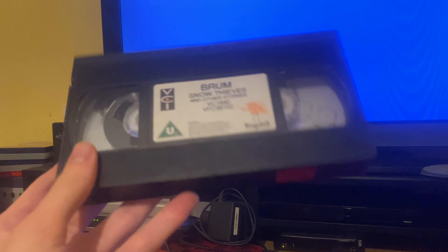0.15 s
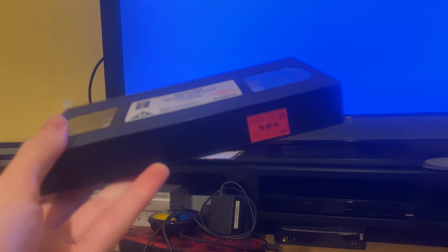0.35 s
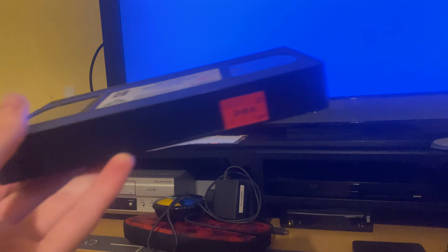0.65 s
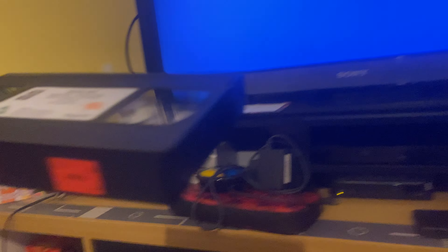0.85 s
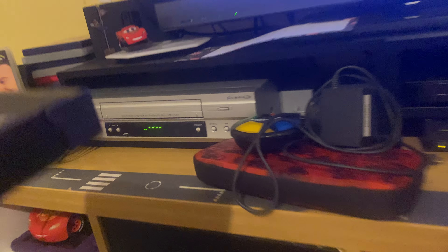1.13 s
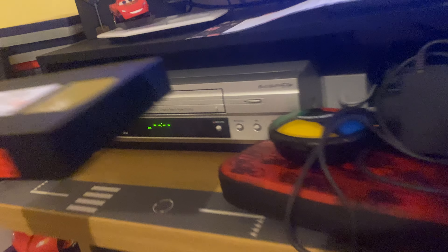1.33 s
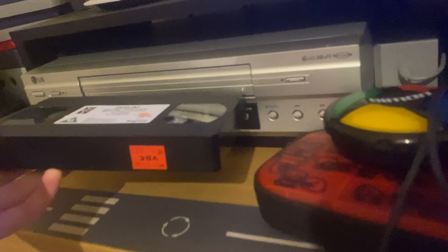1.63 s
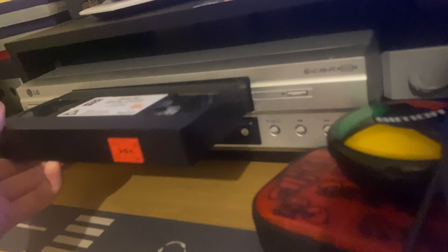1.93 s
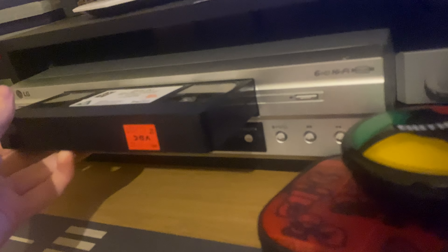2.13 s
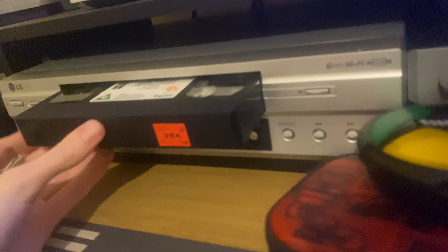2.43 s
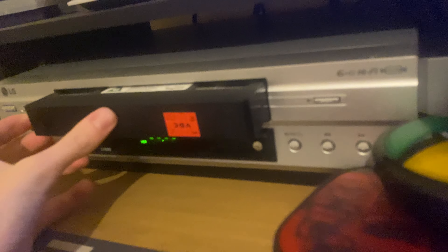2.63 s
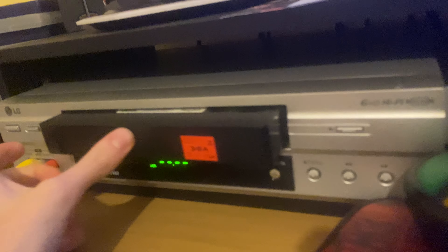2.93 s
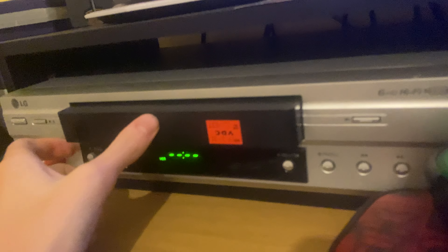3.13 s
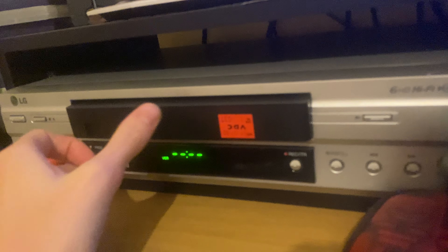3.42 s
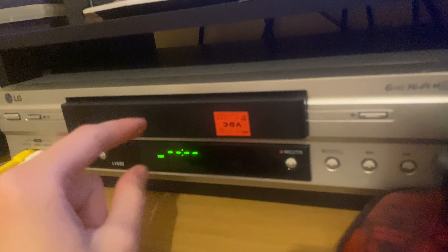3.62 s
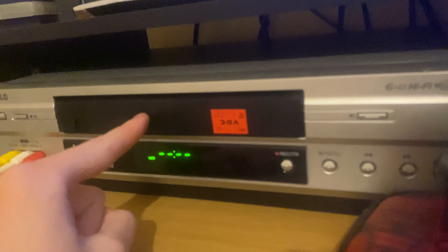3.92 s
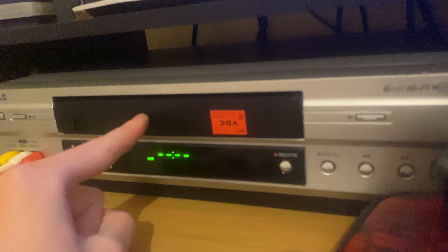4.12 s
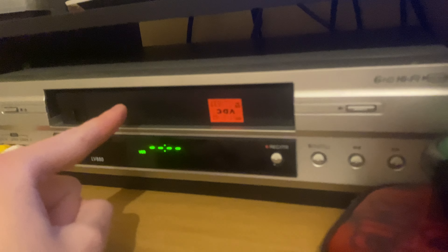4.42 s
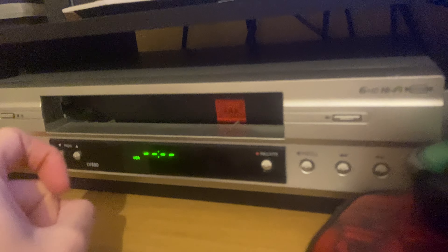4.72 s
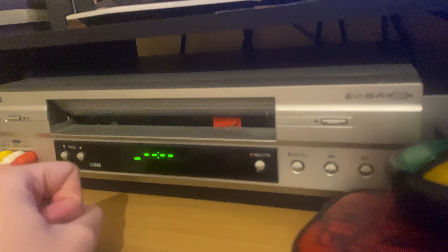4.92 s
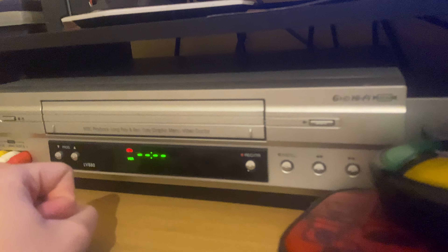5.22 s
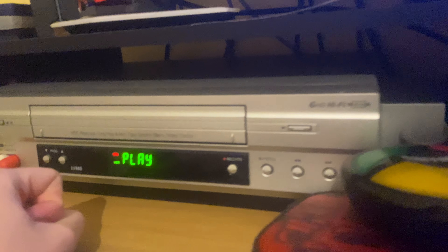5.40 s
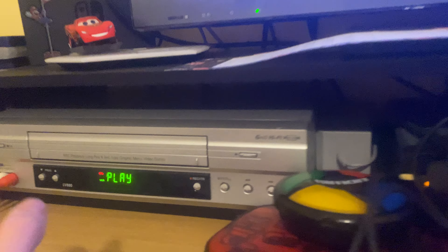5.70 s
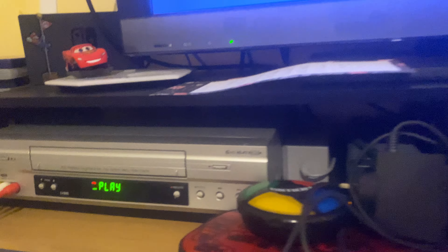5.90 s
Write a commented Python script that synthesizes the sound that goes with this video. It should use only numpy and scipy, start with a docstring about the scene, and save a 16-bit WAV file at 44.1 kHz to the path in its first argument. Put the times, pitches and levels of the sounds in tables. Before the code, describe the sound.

A close stereo microphone in a small room picks up faint hiss, a thin very high whistle and low handling rumble. Light plastic ticks come first, with a dull hollow knock at about 0.8 seconds and a soft finger rub near 1.2. From 1.5 to 2.6 the cassette clatters loudly against the player's slot: rapid hard clacks, boxy thuds and short scrapes. The contacts thin out, with separate clicks around 3.0, 3.25 and 3.35, then near quiet. Around 4.0 the loading mechanism engages, high metallic gear ringing joined by a rough, growling whine near 1200 hertz. At 4.7 to 4.8 the tray drops in a tight cluster of clunks; smaller clicks at 4.9 and 5.1 to 5.2 close the flap. The whine turns thin and faint, a brief very quiet high tone appears around 5.3 to 5.6, and tiny ticks trail off to 6 seconds.

```python
"""Someone pushes a plastic tape cassette by hand into a player in a small room, close to a two-port microphone.
Room hiss, a thin whistle and a low rumble lie underneath from the start: filtered noise and a drifting sine.
The shell then knocks, chatters and scrapes in the tray: short and long stretches of noise, coloured by ringing.
A motor draws the tape in with a whine and ringing gears, the tray drops and the flap shuts.
A brief thin tone sounds as the tape starts."""
import sys
import numpy as np
from scipy import signal
from scipy.fft import rfft, irfft, next_fast_len
from scipy.io import wavfile
from scipy.ndimage import map_coordinates

SR = 44100
rng = np.random.default_rng(int(sys.argv[2]) if len(sys.argv) > 2 else 0)


def level_to_linear(level):
    """Convert decibel levels to linear amplitude factors, elementwise."""
    exponent = np.asarray(level, float) / 20
    return 10 ** exponent


def dump(signal):
    """Clip the signal to [-1, 1] and save it as 16-bit WAV at the path in sys.argv[1]."""
    limited = np.clip(np.atleast_2d(signal).T, -1, 1)
    pcm = np.round(limited * 32767).astype(np.int16)
    wavfile.write(sys.argv[1], SR, pcm)


N = 266893

# strength of the low rumble before each use trims it: (time [s], level [dB])
RUMBLE_LEVEL = [(0, -57.5), (.2, -57.5), (.33, -53), (.69, -55.5), (.83, -39), (.94, -49.5), (1.02, -60),
                (1.25, -59), (1.43, -60), (1.5, -41), (1.62, -40.5), (1.69, -39), (1.75, -52), (1.82, -42),
                (1.95, -59.5), (2.26, -60), (2.33, -48), (2.37, -66), (2.42, -50), (2.54, -60), (3, -77),
                (3.12, -57.5), (3.2, -89), (3.3, -65), (3.42, -56), (3.48, -74), (4.05, -89), (4.65, -73),
                (4.8, -55.5), (5, -53.5), (5.1, -67), (5.6, -79), (5.73, -73.5), (6.05, -78.5)]
FREED_S = 4.8  # from here the tape runs and the motor is no longer loaded


def unit(x):
    """Scales a sound to an rms of 1, so that a level can be set afterwards."""
    return x / np.sqrt(np.mean(x ** 2) + 1e-20)


def along(points, hz):
    """Reads a curve of (frequency [Hz], value) points on a log frequency axis."""
    f, v = np.transpose(points)
    return np.interp(np.log(hz + 1), np.log(f + 1), v)


def curves(rows):
    """Gives one value per sample for each column after the time."""
    s, *cols = np.transpose(rows)
    return [np.interp(np.arange(N) / SR, s, c) for c in cols]


def wobble(rate):
    """Draws a smooth random curve with rate random points a second."""
    return map_coordinates(rng.standard_normal(N // 20), [np.arange(N) * rate / SR])


def held(s, hold, db, rise, fall):
    """Gives a level [dB] that climbs 30 dB per rise [s], holds, then drops 30 dB per fall [s]."""
    t = np.arange(N) / SR - s
    return db + 30 * (np.minimum(t, 0) / rise - np.maximum(t - hold, 0) / fall)


def tone(hz, db):
    """Makes a sine that follows a pitch and an rms level."""
    return np.sqrt(2) * level_to_linear(db) * np.sin(2 * np.pi * np.cumsum(hz) / SR)


def filtered(x, response):
    """Filters x by a complex response of frequency."""
    m = next_fast_len(N + SR // 2)
    return irfft(rfft(x, m) * response(np.fft.rfftfreq(m, 1 / SR)), m)[..., :N]


def modes(table):
    """Response of things that ring: a sum of (frequency [Hz], width [Hz], level [dB]) resonances."""
    def response(f):
        total = 0
        for k, (centre, width, db) in enumerate(table):
            peak = 1j * f * width / (centre * centre - f * f + 1j * f * width)
            total = total + (-1) ** k * level_to_linear(db) * peak  # signs alternate
        return total
    return response


def band(lo_hz, hi_hz):
    """Response of the shell within one band: its overall colour and the resonances of its panels."""
    # colour of struck plastic and sheet metal: (frequency [Hz], density [dB per Hz])
    shell_colour = [(71, -56.5), (120, -26), (508, -9.5), (735, -4.5), (942, -2), (2240, -3), (2690, -7),
                    (3740, -9.5), (5210, -11), (6950, -17.5), (9460, -18.5), (11200, -19), (13200, -19),
                    (16500, -24)]
    # ringing panels of shell and tray: (frequency [Hz], width [Hz], level [dB])
    panel_rings = [(713, 120, -6), (919, 48, 7), (1161, 280, -7), (1248, 30, 8), (1846, 90, -2),
                   (2218, 60, 6), (3364, 420, -12), (4360, 120, 8), (4870, 680, -3), (6430, 400, 9.5),
                   (11170, 860, -5.5)]

    def response(f):
        edges = (1j * f / (lo_hz + 1j * f) * hi_hz / (hi_hz + 1j * f)) ** 2
        return edges * level_to_linear(along(shell_colour, f)) * (1 + modes(panel_rings)(f))
    return response


def grainy(rough):
    """Makes two noises whose strength jumps together, as a rubbing surface slips."""
    return unit(rng.standard_normal((2, N)) * np.exp(rough * wobble(500)))


def hiss():
    """The room and the microphone hiss: steady noise with a fixed colour."""
    # colour of the hiss: (frequency [Hz], density [dB per Hz])
    hiss_colour = [(30, -1), (70, 0), (250, -8), (600, -2.5), (1300, -9.5), (2500, -6.5), (5000, -33),
                   (8000, -32), (11500, -24.5), (14000, -30), (15600, -34), (16000, -65)]
    noise = rng.standard_normal((2, N))
    return level_to_linear(-67.0) * unit(filtered(noise, lambda f: level_to_linear(along(hiss_colour, f))))


def whistle():
    """A thin, fuzzy high whistle: noise squeezed through a narrow resonance."""
    # the whistle: (frequency [Hz], level before a 5 dB lift [dB])
    whistle_line = [(15186, -87)]
    (hz, db), = whistle_line
    noise = rng.standard_normal((2, N))
    return level_to_linear(db + 5) * unit(filtered(noise, lambda f: modes([(hz, 160, 0)])(f) ** 2))


def rumble():
    """A lumpy rumble: a low sine of drifting pitch plus noise around 70 Hz, partly alike at both ports."""
    # middle of the drifting pitch: (time [s], frequency [Hz])
    rumble_pitch = [(0, 73.8), (1.42, 72), (1.52, 55.95), (4.8, 59.3), (5, 70.7), (6.05, 62.6)]
    hz, = curves(rumble_pitch)
    db, = curves(RUMBLE_LEVEL)
    drifting = tone(hz + 5 * wobble(30), db - 1.6 + 2.4 * wobble(20))
    noise = [[1, 0.44], [1, -.4]] @ rng.standard_normal((2, N))
    lumps = level_to_linear(db - 2.5) * unit(filtered(noise, lambda f: modes([(70, 110, 0)])(f) ** 2))
    return drifting + lumps


def slide():
    """Plastic rubs along the guides: uneven slips in three bands, and small rattles in tray and shell."""
    # rubbing: (time [s], strength before the layer levels [dB], brightness [dB])
    rubbing = [(0, -74, -6.5), (.2, -66.5, -2), (.5, -88.5, -22), (.72, -58.5, 6), (.99, -57, 2),
               (1.23, -67.5, 5), (1.48, -57, 3.5), (1.62, -80, -12), (1.72, -36.5, -1.5), (1.85, -60, 6),
               (1.97, -52, -8), (2.11, -44, -1), (2.19, -43, 5), (2.44, -48.5, -1), (2.53, -43.5, 2.5),
               (2.66, -57.5, -4), (2.8, -64, -2.5), (2.95, -64, -3.5), (3.15, -65, 3), (3.32, -49.5, -0.5),
               (3.5, -68, 6), (3.77, -70.5, 0), (4.03, -65, 1.5), (4.24, -66, 8), (4.45, -63, 13.5),
               (4.63, -53, 2), (4.85, -51, 9), (5.07, -57.5, -3.3), (5.22, -65.5, -5), (5.36, -67, -4),
               (5.73, -69, 2.5), (6.05, -66, 0)]
    ticks_per_s, tick_spread_db = 130, 4
    scrape_db, rustle_db, tick_db = -8, -15.5, -7.5  # over the strength of the rub
    rub_db, bright_db = curves(rubbing)
    stroke = wobble(25)

    rub_level = level_to_linear(rub_db - bright_db + 1.7 * stroke)
    rub = rub_level * unit(filtered(grainy(rough=0.37), band(580, 1500)))
    scrape_level = level_to_linear(rub_db + scrape_db + 1.3 * stroke)
    scrape = scrape_level * unit(filtered(grainy(rough=0.28), band(2030, 2900)))
    rustle_level = level_to_linear(rub_db + rustle_db + bright_db + 1.7 * wobble(23))
    rustle = rustle_level * unit(filtered(grainy(rough=0.33), band(3500, 18000)))

    # each tick is a burst of noise that dies away over 2.7 ms
    starts = (rng.random(N) < ticks_per_s / SR) * level_to_linear(tick_spread_db * rng.standard_normal(N))
    fading = filtered(starts, lambda f: 1 / (1 + 2j * np.pi * f * 0.0027))
    bursts = fading * rng.standard_normal((2, N))
    ticks = level_to_linear(rub_db + tick_db) * unit(filtered(bursts, band(1200, 6980)))
    return rub + scrape + rustle + ticks


def drone():
    """Rub and rumble make the case drone: rough noise through two low, wide resonances."""
    # rubbing: (time [s], strength before its trim [dB], brightness [dB], unused here)
    rub_strength = [(0, -74, -6.5), (.2, -66.5, -2), (.5, -88.5, -22), (.72, -58.5, 6), (.99, -57, 2),
                    (1.23, -67.5, 5), (1.48, -57, 3.5), (1.62, -80, -12), (1.72, -36.5, -1.5),
                    (1.85, -60, 6), (1.97, -52, -8), (2.11, -44, -1), (2.19, -43, 5), (2.44, -48.5, -1),
                    (2.53, -43.5, 2.5), (2.66, -57.5, -4), (2.8, -64, -2.5), (2.95, -64, -3.5),
                    (3.15, -65, 3), (3.32, -49.5, -0.5), (3.5, -68, 6), (3.77, -70.5, 0), (4.03, -65, 1.5),
                    (4.24, -66, 8), (4.45, -63, 13.5), (4.63, -53, 2), (4.85, -51, 9), (5.07, -57.5, -3.3),
                    (5.22, -65.5, -5), (5.36, -67, -4), (5.73, -69, 2.5), (6.05, -66, 0)]
    from_rub = level_to_linear(curves(rub_strength)[0] - 5.5)
    from_rumble = level_to_linear(curves(RUMBLE_LEVEL)[0] - 10.5)
    shaken = np.hypot(from_rub, from_rumble) * level_to_linear(3.3 * wobble(11))
    return shaken * unit(filtered(grainy(rough=0.45), modes([(130, 200, -5.0), (269.7, 456, -7)])))


def hum():
    """A low hum: a sine whose level wavers."""
    # the hum: (time [s], frequency [Hz], middle level [dB])
    hum_path = [(.1, 186.3, -90), (.27, 182.7, -57.5), (.62, 182.9, -59), (.9, 190.3, -56), (1.1, 182, -84),
                (1.3, 183.8, -110)]
    hz, db = curves(hum_path)
    return tone(hz, db + 3 * wobble(19.0))


def contacts():
    """Shell, tray and flap meet and chatter: each burst of noise drives case, shell body, shell and edges."""
    # contacts: (time [s], level [dB], thud in the case [dB], brightness [dB], chatter, kept to 0.001-0.06 [s])
    hits = [(0.1938, -58.5, -52, -9.5, 0.019), (0.3047, -40.5, -65, -6, 0.018),
            (0.3263, -53, -75, 2, 0.0065), (0.6676, -52, -49, -8, 0.011), (0.7537, -49.5, -61, -1, 0.038),
            (0.8204, -39.5, -43, -3.5, 0.0082), (0.9796, -53, -83, -1.5, 0.028),
            (1.138, -52.5, -89, -4, 0.03), (1.1606, -49, -83, -2.5, 0.036), (1.189, -48, -60, -3.5, 0.026),
            (1.207, -58, -59, -6.5, .005), (1.4086, -49, -60, -3.5, 0.033),
            (1.493, -50.5, -40.5, -26, 0.0028), (1.5692, -21, -33, 0.9, 0.015),
            (1.5771, -14.5, -35, -0.5, 0.0079), (1.5944, -35.5, -60, -16.5, 0.008),
            (1.6119, -15, -30.5, 2.4, 0.0089), (1.6406, -20.5, -42, 0.2, 0.01),
            (1.6581, -19, -35, 3, 0.012), (1.6724, -19, -34, -4.5, 0.0045), (1.714, -26, -40, 2, 0.0053),
            (1.7322, -17, -32.5, -0.7, 0.0054), (1.7586, -32.5, -33, -6, 0.0054),
            (1.9133, -24.5, -34.5, -2.9, 0.01), (1.9612, -23.5, -34.5, 1.5, .014),
            (1.9872, -22, -66, -2, 0.013), (2.0081, -12.5, -33, -0.5, 0.0077),
            (2.037, -30, -30, -11.5, 0.0077), (2.0529, -15.5, -25.5, -1, 0.0057),
            (2.0663, -40, -28.5, 2, 0.0073), (2.09, -35, -55, -1, 0.013), (2.11, -52, -71, -8, .005),
            (2.1418, -28.5, -32, -8.5, 0.012), (2.154, -21.5, -51, 2, 0.0031),
            (2.1957, -25, -36, -6.5, 0.0057), (2.2072, -34.5, -39, -7.5, 0.023),
            (2.2447, -17, -59, -3.5, 0.0052), (2.2714, -21, -57, -2, 0.0071),
            (2.2846, -18.5, -28.5, -3.8, 0.0043), (2.32, -28, -40, -4, 0.01),
            (2.3342, -38, -47, -10, 0.0058), (2.3835, -21, -20, -4, 0.0081), (2.4268, -44, -25.5, 5, .006),
            (2.4504, -43.5, -40.5, -7, 0.061), (2.527, -32, -38, -2.5, 0.0081),
            (2.5545, -22.5, -31, -3.5, 0.003), (2.5953, -35, -57, -11, 0.0057),
            (2.6133, -34, -64, -4.5, 0.0066), (2.718, -32.5, -56, -3.5, 0.0045),
            (2.7412, -44, -78, -3, 0.0037), (2.8445, -53, -57, -11.5, 0.048),
            (2.8783, -48, -56.5, -11.5, 0.03), (2.937, -44, -53, -6.5, 0.07), (2.9909, -47, -62, 5, 0.022),
            (3.0268, -37, -32.5, -6.5, 0.0078), (3.254, -29.5, -45, -4, 0.0082),
            (3.2773, -43, -47, -6, 0.008), (3.3463, -24, -40.5, -3.5, .008), (3.378, -74, -44, -14, 0.0079),
            (3.4749, -51, -60.5, 4.5, 0.0051), (3.6292, -56, -70.5, -6.5, .006),
            (3.677, -73.5, -69.5, -8, 0.0063), (3.8373, -52, -58, -9.5, 0.0099),
            (3.905, -44, -70, -0.5, 0.013), (3.936, -49.5, -54, -9, 0.016), (3.9782, -54, -64, -8, 0.012),
            (4.1762, -49.5, -72, 10, 0.0046), (4.232, -60, -71, -9.5, 0.0042),
            (4.245, -45.5, -41.5, 1, 0.0071), (4.2785, -51, -80, -8, .012), (4.3131, -53, -65, 2, 0.0079),
            (4.586, -53.5, -45.5, -8.5, 0.024), (4.6208, -37.5, -35.5, 10.5, 0.0029),
            (4.7164, -31, -53, -4.3, 0.0088), (4.728, -24.5, -46, 0, 0.013),
            (4.7368, -23.5, -35.5, 3.5, 0.01), (4.7519, -28.5, -27.5, -12, 0.0078),
            (4.7635, -17.5, -21, -2.5, 0.013), (4.7762, -32, -27, 1, 0.0073), (4.7914, -41, -58, 4.7, 0.02),
            (4.8847, -40.5, -55, -9, 0.04), (4.9077, -32.5, -40, 6.2, 0.0064),
            (4.9143, -31.5, -33.5, -11, .015), (4.9249, -28.5, -31.5, 8, 0.0054),
            (4.9556, -45, -60, -7, .009), (5.1308, -31.5, -45, -7, 0.0085), (5.1559, -42, -48.5, -7, 0.016),
            (5.198, -38.5, -52, -3.5, 0.0068), (5.245, -54, -44, -19.5, 0.0055),
            (5.5902, -52.5, -70, 7, 0.013), (5.627, -57.5, -91.5, 4.5, 0.017),
            (5.8918, -56.5, -80, -2.2, 0.025), (5.9186, -62.5, -75.5, 2.5, 0.016)]
    # hollow case of the player: (frequency [Hz], width [Hz], level [dB])
    hollow_case = [(211, 50.4, -1), (309.5, 65, 4), (340, 110, -11.5)]
    body_db, edge_db = -1.5, -0.36  # over the level of a contact as hard as hard_db
    body_fades, edge_fades, hard_db = 0.12, 0.15, -22  # lighter contacts reach these less [dB per dB]
    rise_s, rise_share, thud_lag_s = 0.0013, 0.11, 0.0034  # longer chatter rises later; the case follows slowly
    lag = np.array([[[thud_lag_s]], [[0]], [[0]], [[0]]])
    t = np.arange(SR // 6) / SR
    drive = np.zeros((4, 2, N + SR))  # four parts, two noises each

    for s, db, thud_db, bright_db, chatter in hits:
        slips = np.exp(0.43 * map_coordinates(rng.standard_normal(200), [t * 400]))
        chatter = np.clip(chatter, .001, .06)
        rise = 1 - np.exp(-t / (rise_s + rise_share * chatter + lag))
        swell = rise * np.exp(-(t / (chatter + lag)) ** 1.115)
        # brightness tips body and edges against each other
        harder = db - hard_db
        body = db + body_db + body_fades * harder - bright_db
        edge = db + edge_db + edge_fades * harder + bright_db
        levels = level_to_linear(np.array([thud_db, body, db, edge]))[:, None, None]
        burst = rng.standard_normal((2, len(t))) * slips
        drive[..., round(s * SR):][..., :len(t)] += levels * burst * swell

    # steady noise shows how loud each part answers, so that the levels above hold
    probe = rng.standard_normal(N)
    parts = [modes(hollow_case), band(672, 1300), band(2050, 4360), band(5360, 16000)]
    return sum(filtered(d[:, :N], part) / np.std(filtered(probe, part)) for d, part in zip(drive, parts))


def bumps():
    """Clear knocks of the shell, each one or more short sines whose pitch sags quickly."""
    # sines of the knocks: (time [s], level before the swell [dB], start pitch [Hz], end pitch [Hz], length [s])
    knock_sines = [(0.82, -29, 2450, 2380, 0.0029), (0.8194, -24.5, 1630, 1500, 0.004),
                   (0.819, -14, 800, 232, 0.012), (0.824, -14, 200, 80, 0.0077),
                   (0.883, -25.5, 130, 93.5, 0.03), (1.498, -20, 1430, 1150, 0.0069),
                   (2.72, -34, 710, 149, 0.018), (4.7659, -14, 1051, 688, 0.007)]
    t, out = np.arange(SR // 5) / SR, np.zeros(N)
    for s, db, start_hz, end_hz, fade in knock_sines:
        pitch = end_hz + (start_hz - end_hz) * np.exp(-t / 0.00356)
        swell = (t / fade) ** 0.51 * np.exp(-(t / fade * 2.12) ** 2)
        sine = level_to_linear(db) * swell * np.sin(2 * np.pi * np.cumsum(pitch) / SR)
        out[round(s * SR):][:len(t)] += sine
    return out


def squeak():
    """A finger drags on the shell: very rough noise through a resonance at 1820 Hz."""
    # drags: (time [s], hold [s], level [dB], rise [s per 30 dB], fall [s per 30 dB])
    drags = [(1.153, 0.033, -49.5, 0.044, .03), (3.496, 0.13, -68, 0.1, 0.069)]
    level = sum(level_to_linear(held(*row)) for row in drags)
    return level * unit(filtered(grainy(rough=0.74), lambda f: modes([(1820, 380, 0)])(f) ** 2))


def gear_ringing():
    """The load makes the mechanism ring high up: rough noise through its resonances."""
    # mechanism ringing under load: (frequency [Hz], width [Hz], level [dB])
    gear_rings = [(3960, 53, 0.5), (4270, 50, -4), (5220, 69, -4), (6100, 69, -7.5), (6900, 87, -10),
                  (10300, 280, -12), (12000, 710, -11.5)]
    # load: (time [s], hold [s], level [dB], rise [s per 30 dB], fall [s per 30 dB])
    load_swell = (3.96, .4, -70, .06, 1.2)
    freed = np.arange(N) / SR > FREED_S
    level = level_to_linear(held(*load_swell) + 2.8 * wobble(17) - 40 * freed)
    return level * unit(filtered(grainy(rough=0.35), modes(gear_rings)))


def motor_whine():
    """The gear whine smears and growls under uneven load, and turns thin once the tape runs."""
    # gear whine before its wobble: (time [s], frequency [Hz], level [dB])
    gear_whine = [(4.09, 1187, -79), (4.15, 1200, -64), (4.19, 1170, -67.5), (4.24, 1180, -54),
                  (4.3, 1140, -60.5), (4.38, 1200, -60.5), (4.43, 1140, -58.5), (4.49, 1225, -57.5),
                  (4.54, 1180, -69), (4.7, 1200, -65.5), (5.1, 1266, -69), (5.25, 1286, -64),
                  (5.6, 1235, -67.5), (5.8, 1229, -73), (6.05, 1210, -64)]
    hz, db = curves(gear_whine)
    blur = np.interp(np.arange(N) / SR, [FREED_S, FREED_S + .4], [.55, .1])  # 0 clean, 1 smeared
    whine = tone(hz + 55 * blur * wobble(60), db + 5 * blur * wobble(48))
    housing = modes([(1160, 620, 0)])
    growl_level = blur * level_to_linear(db + 4.5 + 3.5 * wobble(29))
    growl = growl_level * unit(filtered(grainy(rough=0.36), lambda f: housing(f) ** 2))
    return growl + [[1], [0]] * whine  # the whine is wholly shared by the ports


def spinup():
    """A brief thin tone as the tape starts: a wavering sine around 5400 Hz."""
    # tone: (time [s], hold [s], middle level [dB], rise [s per 30 dB], fall [s per 30 dB])
    spin_swell = (5.32, .24, -80, .07, .1)
    return [[1], [0]] * tone(5400 + 55 * wobble(90), held(*spin_swell) + 3 * wobble(30))


def room(x):
    """Each frequency of the room's answer dies at its own speed; a random tail is drawn every quarter second."""
    # time to die away by 60 dB: (frequency [Hz], time [s])
    decay_times = [(150, 0.33), (1000, 0.24), (4000, 0.18), (12000, 0.13)]
    out, step = np.zeros((2, N + SR)), SR // 4
    for start in range(0, N, step):
        hz, t, z = signal.stft(rng.standard_normal((2, SR // 2)), SR, nperseg=256)
        fading = level_to_linear(-60 * t / along(decay_times, hz)[:, None])
        tail = signal.istft(z * fading, SR, nperseg=256)[1]
        tail = tail / np.linalg.norm(tail[0])
        echo = signal.fftconvolve(x[None, start:start + step], tail, axes=1)
        out[:, start + 130:][:, :echo.shape[1]] += echo
    return out[:, :N]


def ports(shared, other):
    """Each port hears the shared sound with its own phase and level, plus a part of opposite sign."""
    # (frequency [Hz], lead of the left [radians], left over right [dB], likeness of the ports [0-1])
    port_pair = [(0, -2.76, 0, 1), (200, -0.08, -2, 0.97), (395, 1.3, -5.5, 0.95), (800, 1.58, 1.5, 0.7),
                 (1708, 2, -3.5, 0.6), (2280, 6, 0, 0), (3230, 3.5, 7, 0.37), (4580, 8.5, 0.5, 0.3),
                 (6060, 11, 0, 0.4), (6140, 15, -1, 0.8), (8270, 10.5, 3.5, 0.52), (9580, 8.5, -1.5, 1),
                 (11200, 5.5, 0, 0.87), (13360, 3.5, 0.5, 0.91), (15930, -1.2, -0.5, 0.96)]
    f, lead, db, alike = np.transpose(port_pair)
    side = np.array([[1], [-1]])

    def turn(hz):  # the mix of the two parts that gives the likeness
        return np.arccos(np.clip(np.interp(hz, f, alike), 0, 1)) / 2

    def port(hz):
        return np.exp(.5j * np.interp(hz, f, lead) * side) * level_to_linear(np.interp(hz, f, db) * side / 2)

    common = filtered(shared, lambda hz: port(hz) * np.cos(turn(hz)))
    unlike = filtered(other, lambda hz: port(hz) * np.sin(turn(hz)) * side)
    return common + unlike


def scene():
    """Near sounds wake the room and pass the two ports; the lows arrive out of step at the ports."""
    near = slide() + drone() + contacts() + squeak() + gear_ringing() + motor_whine() + spinup()
    shared, other = near + level_to_linear(-8.0) * room(near[0]) + hiss() + whistle()
    lows = rumble() + hum() + bumps()
    out_of_step = filtered(lows, lambda hz: np.exp(-.7j * np.array([[1], [-1]])) + 0 * hz)
    return ports(shared, other) + out_of_step


def top_cut(x):
    """Nothing passes above the cut-off."""
    return signal.sosfilt(signal.butter(12, 16810, fs=SR, output="sos"), x)


def record(dry):
    """The microphone drops the deepest bass and the top of the treble."""
    def microphone(hz):
        bass_cut = (1j * hz / (40 + 1j * hz)) ** 2
        treble_cut = level_to_linear(-30 / (1 + np.exp((15900 - hz) / 60)))
        return bass_cut * treble_cut
    mix = filtered(dry, microphone)
    return top_cut(mix)


dry = scene()
out = record(dry)
dump(out)
```